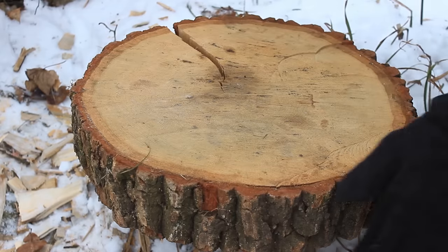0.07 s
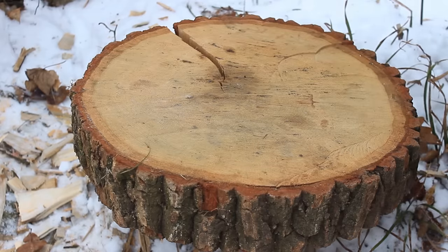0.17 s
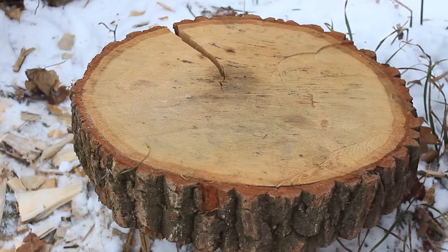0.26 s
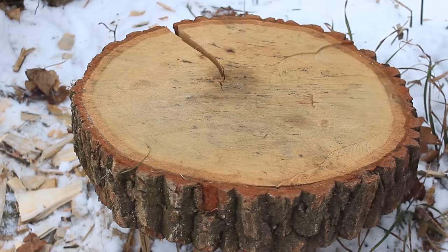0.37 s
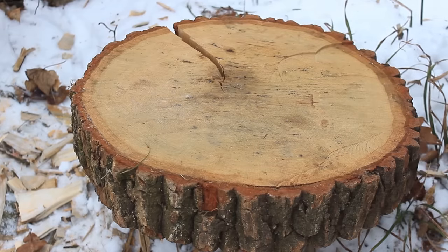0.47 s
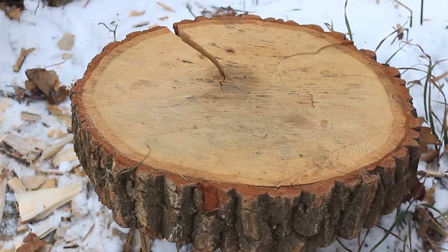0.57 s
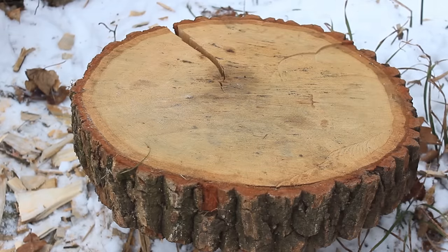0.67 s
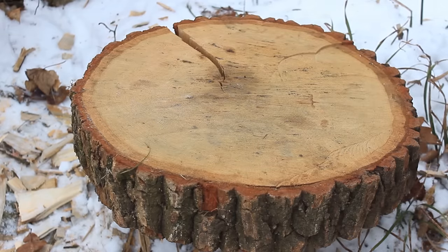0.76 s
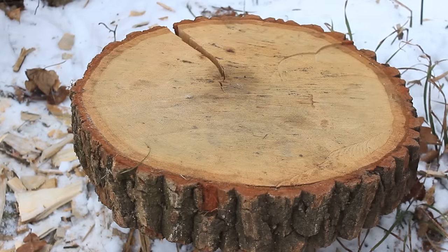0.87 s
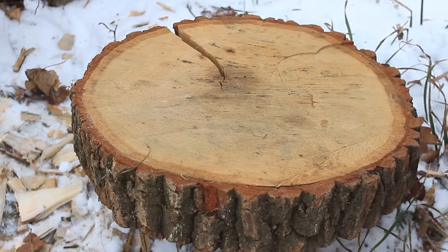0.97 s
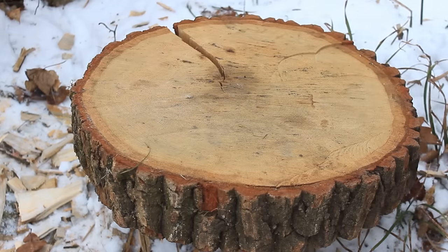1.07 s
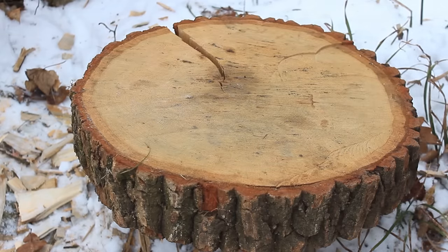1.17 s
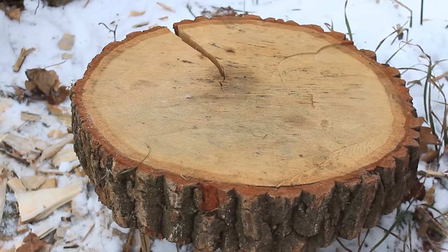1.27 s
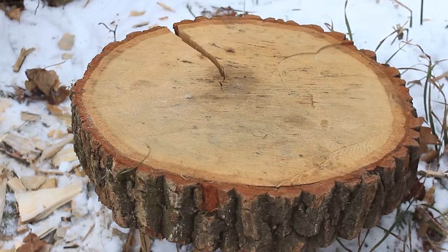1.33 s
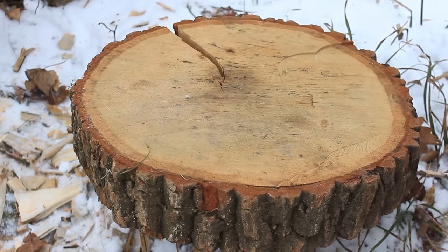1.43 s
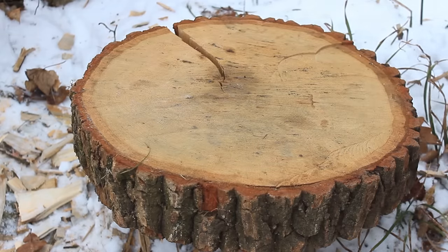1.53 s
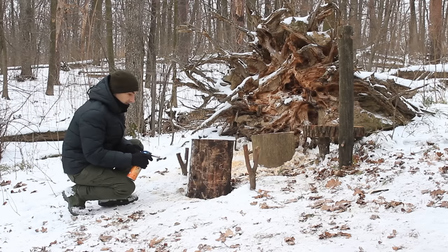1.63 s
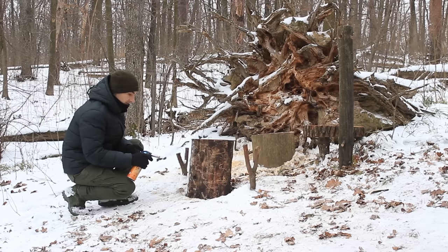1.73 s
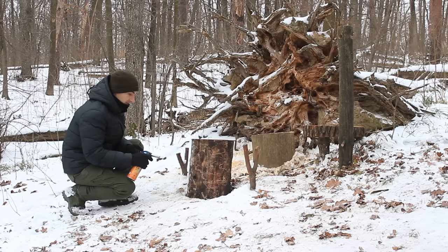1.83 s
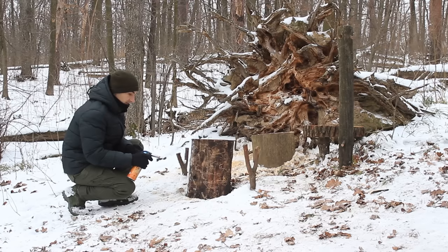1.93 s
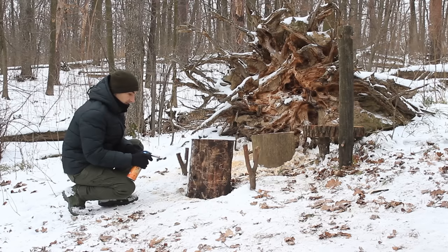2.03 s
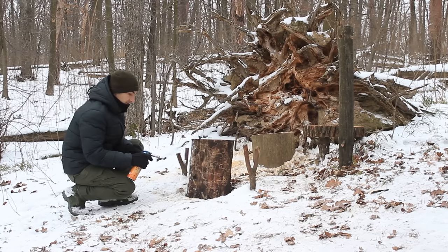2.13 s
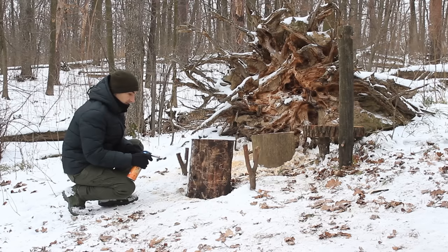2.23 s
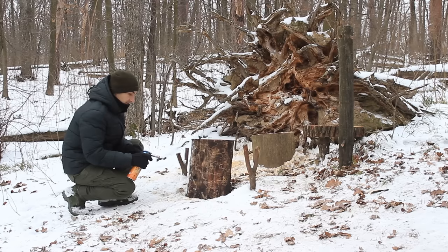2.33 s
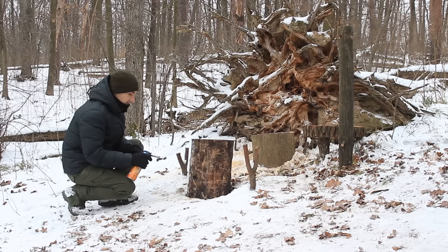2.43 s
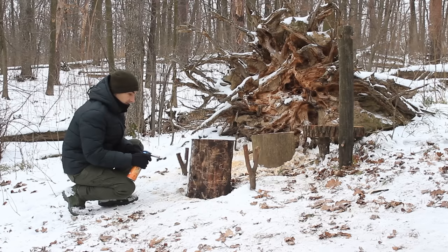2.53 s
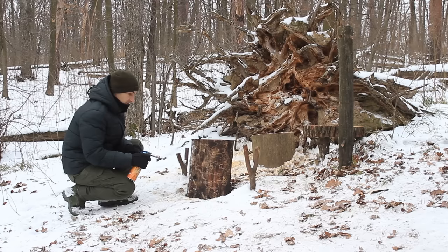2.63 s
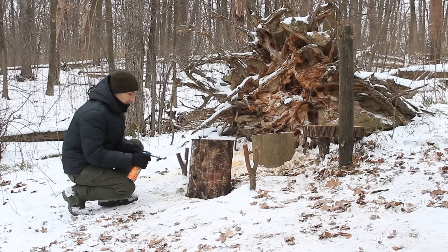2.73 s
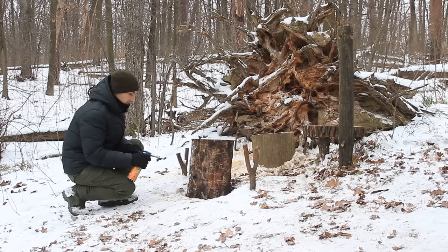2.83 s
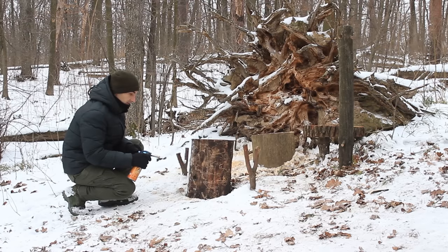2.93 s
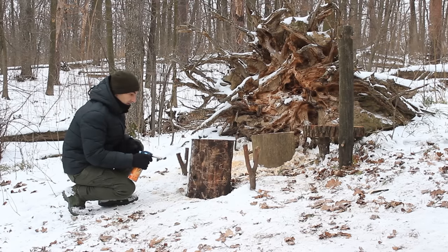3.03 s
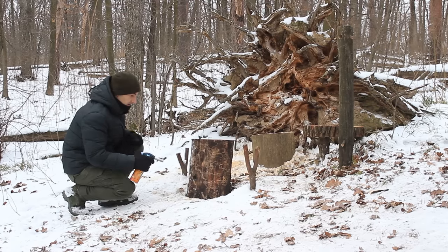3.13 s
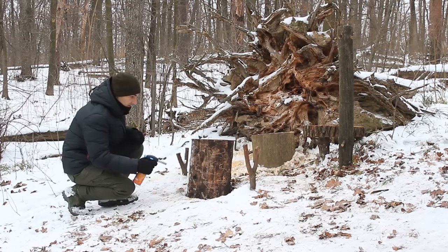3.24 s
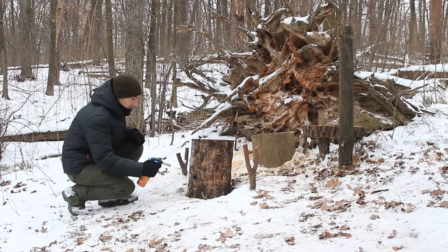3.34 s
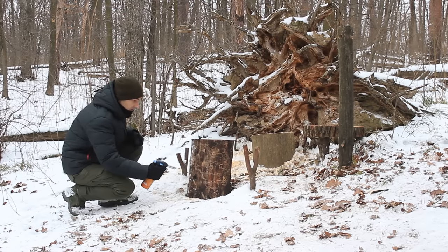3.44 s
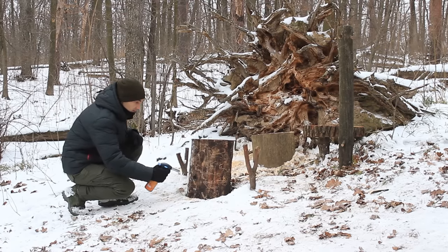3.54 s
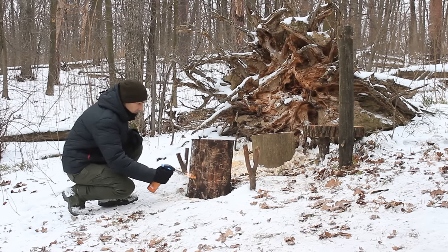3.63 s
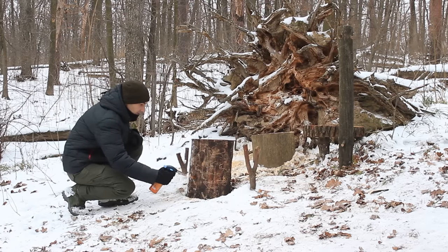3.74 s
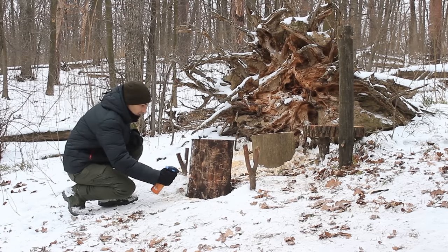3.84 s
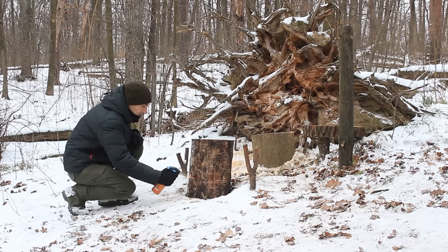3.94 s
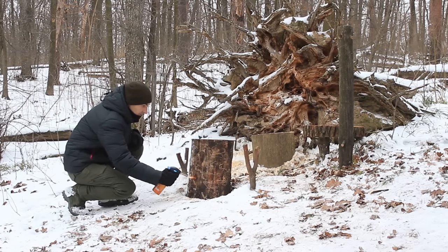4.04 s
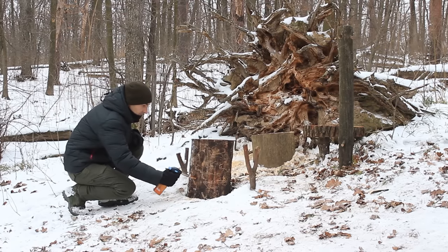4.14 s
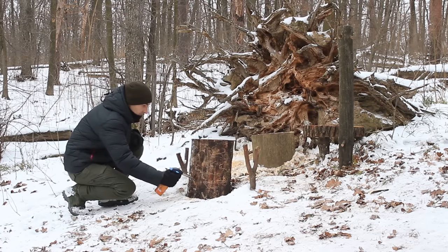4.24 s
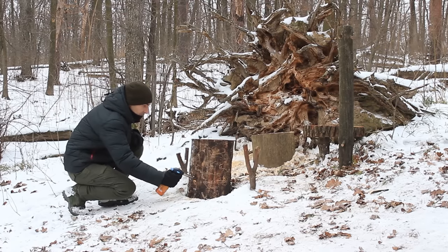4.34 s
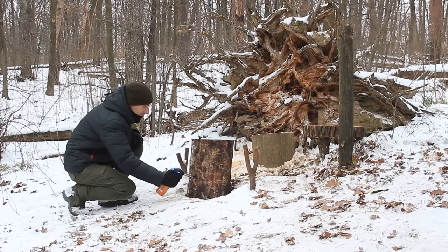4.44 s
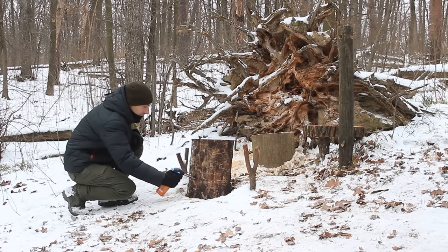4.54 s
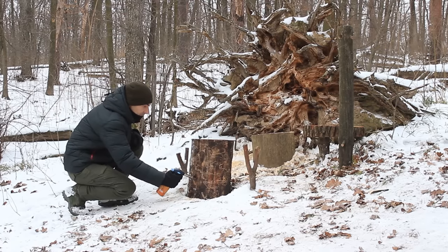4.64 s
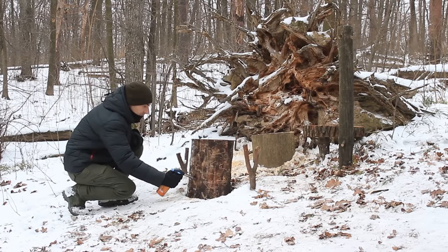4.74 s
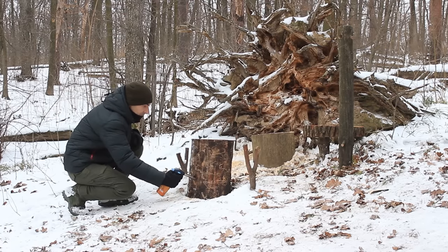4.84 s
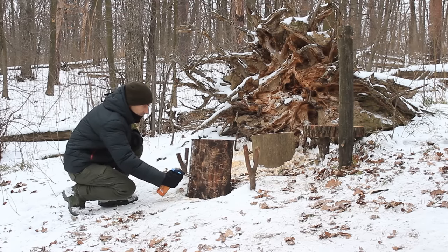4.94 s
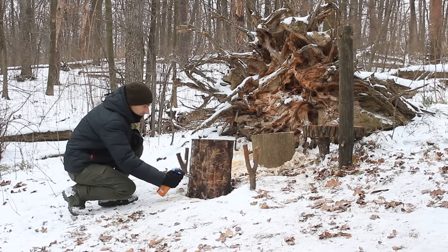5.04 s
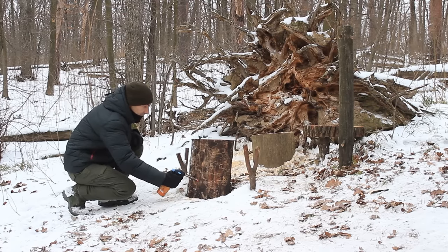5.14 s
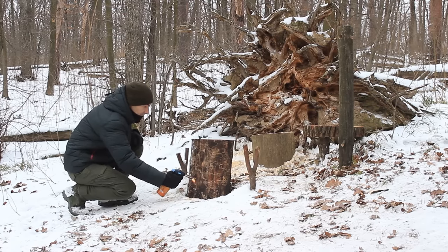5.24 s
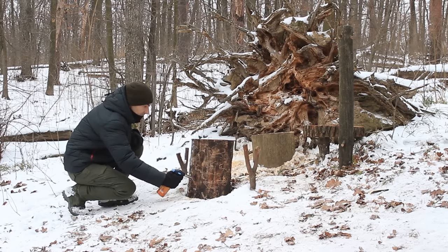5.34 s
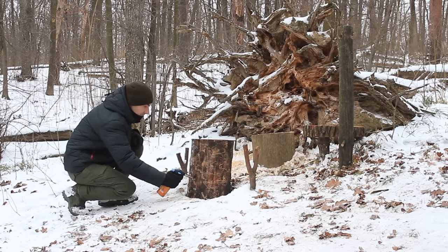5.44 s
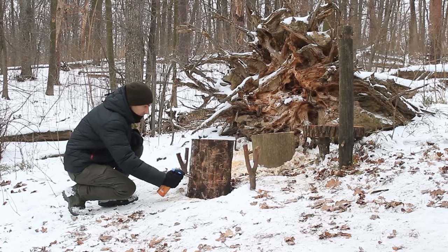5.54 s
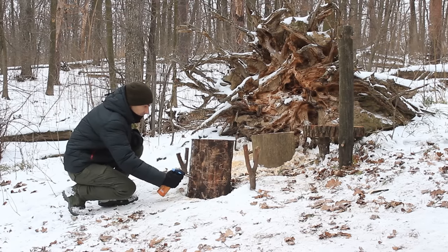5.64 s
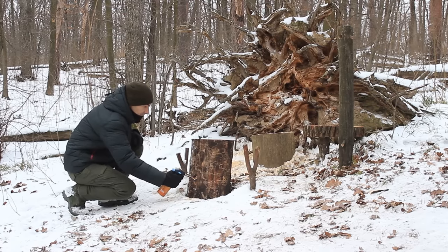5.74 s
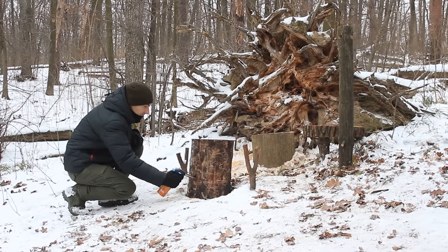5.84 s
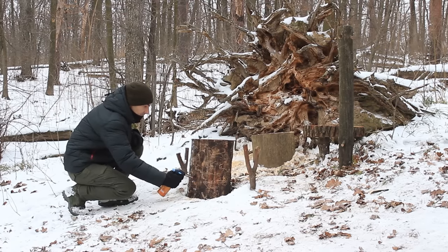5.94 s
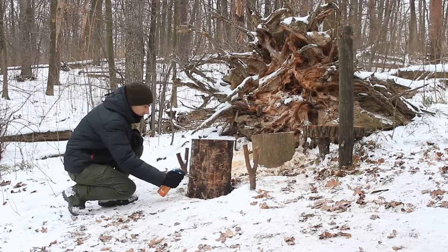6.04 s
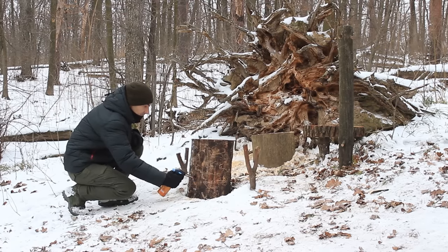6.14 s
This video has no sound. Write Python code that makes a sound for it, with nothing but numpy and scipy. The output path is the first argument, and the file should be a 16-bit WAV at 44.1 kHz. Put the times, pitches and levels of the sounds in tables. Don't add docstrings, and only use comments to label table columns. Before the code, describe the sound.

Quiet cloth rubbing and sparse gritty snow creaks come first, close to the microphone outdoors in winter. After about two seconds a soft, tube-like gas hiss opens, followed by a hard metallic click and a short low thump of ignition. The burning torch roars far louder than everything before, breathy and slightly hollow, sweeping brighter as it descends toward wood. It continues unsteadily, with fluttering hiss and occasional dull pops, to the end. Mono.

```python
import sys
import numpy as np
from scipy import signal
from scipy.io import wavfile
from scipy.ndimage import uniform_filter1d

SR = 44100
rng = np.random.default_rng(int(sys.argv[2]) if len(sys.argv) > 2 else 0)


def ratio(d):
    e = np.asarray(d, float) / 20
    return 10 ** e


def to_wav(sig):
    pcm = np.clip(np.atleast_2d(sig), -1, 1) * 32767
    pcm = np.round(pcm).astype(np.int16)
    wavfile.write(sys.argv[1], SR, pcm.T)


N = 273243
HZ = np.fft.rfftfreq(1024, 1 / SR)
FRAME_S = np.arange(N // 256 + 5) * 256 / SR
SNAP_S = 2.7073

# f/Hz, level/dB (per Hz)
FLAME_TONE = [(35, -62), (60, -33), (211, -2), (261, -3), (388, 1.5), (940, -4), (1080, -9), (1680, -7.5),
              (4090, -28), (5400, -29), (6510, -30), (7670, -34.5), (9240, -36), (15800, -50.5)]
# f/Hz, width/Hz, lift held high/dB, lift at the log/dB
HOT_PIPE = [(398, 270, 3, -3.5), (457, 440, 0, 0.5), (1057, 33.4, 21, 15), (1220, 51, 6.5, 7.5),
            (1349, 81, 10, -4.5), (1400, 54, -6.5, 11.5), (1530, 430, -9, 1.5), (2090, 100, 3, -13),
            (2410, 78, -1, -6), (1697, 75, -2, -10), (2640, 130, -9, 1.5), (2930, 710, 0, 6),
            (4660, 830, 6, 1), (3070, 89, 5, -5), (4060, 280, 6.5, 6), (5560, 300, -3, -1),
            (6370, 200, 9, 4.5), (9230, 430, 6.5, 12.5), (11000, 150, 6, 6), (12200, 990, 7, 14),
            (13600, 900, 3, 2), (15200, 2700, 6, 9)]
# t/s, share of the way (0-1)
TORCH_PATH = [
    (2.7, 0.06),
    (3.15, 0.01),
    (3.35, 0.32),
    (3.48, 0.47),
    (3.6, 0.7),
    (3.7, 0.84),
    (3.8, 1),
    (4.3, 0.92),
    (6.2, 1.02),
]
# t/s, share (0-1), spread/s
GRAZE = [
    (3.8, 1, 0.081),
]
# t/s, lift/dB, spread/s
FLARES = [(3.38, 0, 0.014), (3.43, -0.5, .015), (3.47, 2, .012), (3.5, 0, 0.013), (3.64, 4, 0.021),
          (3.82, 0, .03), (4.03, 1.5, 0.022), (4.11, -2.5, 0.037), (4.39, 2, 0.022), (4.47, -1, .02),
          (4.62, 1, 0.076), (4.79, 1.5, 0.098), (5.02, 2.5, .04), (5.38, -2.5, .025), (5.5, -4.5, 0.014),
          (5.72, 0.5, 0.018), (6.0, -1, .03), (6.13, 0, 0.021)]
# t/s, lift/dB, spread/s
DRAUGHTS = [(3.46, -2, 0.029), (3.83, 5, 0.091), (3.89, -7, 0.04), (4.01, 2, 0.021), (4.25, -3, 0.027),
            (4.33, -7, 0.036), (4.47, -10, .02), (4.53, 3.5, .04), (4.62, -2, .015), (4.66, -1, .02),
            (4.76, -10, 0.028), (4.85, 2, 0.046), (5.05, -12, .035), (5.12, 5, 0.018), (5.39, 5, 0.037),
            (5.46, -3, .02), (5.55, 3, 0.032), (5.9, 3, .03), (6.15, -10, 0.053), (6.2, 8, .02)]


def flame():
    lowered = curve(TORCH_PATH, FRAME_S)
    bite = ramp(FRAME_S, 3.9, 4.67)
    graze = bumps(GRAZE, FRAME_S)
    flare_db, draught_db = bumps(FLARES, FRAME_S), bumps(DRAUGHTS, FRAME_S)
    flash_db = 9 * np.exp(-np.maximum(FRAME_S - SNAP_S - .02, 0) / 0.0069)

    roar_db = -39 + 3.5 * lowered + 0.5 * bite + flare_db * (1 - 0.5 * above(1060))
    rush_db = -46.5 - 5 * abs(lowered) ** 0.57 + 4 * bite
    rush_db = rush_db + 0.42 * flare_db + 0.22 * draught_db + .2 * flash_db
    jet_db = -58.5 - 2 * abs(lowered) ** 0.52 + flash_db
    jet_db = jet_db + draught_db * (1 - 0.54 * above(9500))
    rasp_db = -3.5 * lowered + 6 * bite - 2.5 * graze

    waver = 1 + 0.0046 * evened(uniform_filter1d(rng.standard_normal(len(FRAME_S)), size=25))
    low = np.clip(0.031 + 0.69 * lowered + 0.23 * bite, 0, 1)
    pipe_db = sum((high + low * (down - high)) * hump(hz * waver, w) for hz, w, high, down in HOT_PIPE)

    notch_hz = 1 / ((1 - lowered) / 725 + lowered / 2100)
    snow = echo(notch_hz, 2.92 * notch_hz, 0.52 + 0.35 * graze, dull_hz=3430)
    stump = echo(582, 349, 0.067 + 0.17 * low, dull_hz=1700)
    tone = ratio(read(FLAME_TONE) + pipe_db + rasp_db * hump(1030, 900)) * snow * stump

    roar = noise(tone * np.sqrt(1 - above(2300)), (150, 1400), roar_db, patchy_db=1.03, flicker_db=0.8)
    rush_tone = tone * np.sqrt(above(2310) - above(6430))
    rush = noise(rush_tone, (2600, 6800), rush_db, patchy_db=1.1, flicker_db=0.4)
    jet = noise(tone * np.sqrt(above(6500)), (7000, 15000), jet_db, patchy_db=2.3, flicker_db=1.2)
    roar = signal.lfilter(*signal.butter(2, 95, "high", fs=SR), roar)
    roar = signal.lfilter(*signal.iirnotch(258, 4.5, SR), roar)
    drone = hum(215.4, 45.4, level_db=-48)
    lit = np.clip((np.arange(N) / SR - SNAP_S - .003) / 0.0021, 0, 1)
    return (roar + drone + rush + jet) * lit


# delay t/s, level/dB
SNAP = [
    (0, -7),
    (.0004, -2),
    (.0008, -1),
    (.0012, -1),
    (.0017, -5),
    (.0042, -15),
    (.0072, -15),
]
# f/Hz, level/dB, time to fall 60 dB/s
SNAP_MODES = [(1850, -9, .018), (2650, 6, .011), (3350, 2, .011), (4100, -3, .007), (4900, 6, .008),
              (5300, -4, .006), (6600, 0, .007), (7300, 3, .007), (8400, -4, .012), (9300, -2, .005),
              (10050, 3, .007), (12370, -7, .022), (14400, -13, .025)]
# t/s, f/Hz, level/dB, time to fall 60 dB/s
RINGS = [
    (2.712, 1034, -35.5, 0.19),
    (2.712, 446, -42, 0.043),
    (2.709, 84, -35, 0.13),
    (2.713, 1780, -24.5, 0.022),
]
# t/s, f/Hz, level/dB, swell/s
THUMP = (2.7085, 170, -24.5, .0043)


def ignition():
    out, t = np.zeros(N), np.arange(5000) / SR
    phases = rng.random((len(SNAP), len(SNAP_MODES)))
    for (late, db), turns in zip(SNAP, phases):
        ring = np.zeros(len(t))
        for (hz, mode_db, t60), turn in zip(SNAP_MODES, turns):
            ring += ratio(mode_db - 60 * t / t60) * np.sin(2 * np.pi * (hz * t + turn))
        add(out, SNAP_S + late, ratio(db - 28) * ring)
    rattle = ratio(-29 - 60 * t / .032) * rng.standard_normal(len(t))
    add(out, SNAP_S, rattle)
    snap_echo = ratio(-40 - 60 * t / .012) * np.sin(2 * np.pi * 10100 * t)
    add(out, SNAP_S + .022, snap_echo)

    for s, hz, db, t60 in RINGS:
        onset = 1 - np.exp(-t / 0.00077)
        add(out, s, ratio(db - 60 * t / t60) * onset * np.sin(2 * np.pi * hz * t))
    s, hz, db, swell = THUMP
    push = (t / swell * np.exp(1 - t / swell)) ** 2
    add(out, s, ratio(db) * push * np.sin(2 * np.pi * hz * t))
    return out


# f/Hz, level/dB
GAS_TONE = [(700, -22), (2000, -21), (5000, -13.5), (9000, -19.5), (10500, -30), (11300, -25),
            (11700, -17.5), (12500, -21), (12900, -28), (14500, -23), (15800, -22)]
# f/Hz, width/Hz, level/dB
COLD_PIPE = [(1620, 96, -7), (2570, 200, -7.5), (3555, 185, 1.5), (4230, 120, -4.5), (4590, 56, -6),
             (5230, 220, -11.5), (6120, 170, -5.5), (6860, 290, -12), (7800, 300, -15), (8750, 160, -21),
             (12200, 260, -20), (14100, 170, -17), (15300, 46, -13)]


def gas():
    pipe_power = sum(ratio(2 * db) * hump(hz, 1.5 * w) ** 2 for hz, w, db in COLD_PIPE)
    tone = np.sqrt(ratio(2 * read(GAS_TONE)) + pipe_power)
    hiss = noise(tone, (2300, 9000), 0, patchy_db=0.7, flicker_db=0.5) + hum(248, 50, level_db=-24)
    t = np.arange(N) / SR
    opening_db = -19 * np.exp(-np.maximum(t - 2.018, 0) / 0.025)
    trigger_db = -28 * np.maximum(t - 2.65, 0)
    fade_in = np.clip((t - 2.0) / 0.027, 0, 1)
    burnt = np.clip((SNAP_S + 0.019 - t) / 0.0058, 0, 1)
    return hiss * ratio(-49.5 + opening_db + trigger_db) * fade_in * burnt


# t/s, peak level/dB
POPS = [
    (3.9522, -26),
    (3.9581, -24),
    (4.498, -33),
    (4.501, -33),
    (4.5213, -26),
    (5.0567, -29),
    (5.311, -24),
]


def pops():
    out, u = np.zeros(N), np.arange(-100, 100) / SR / 0.00045
    for s, db in POPS:
        add(out, s - 100 / SR, ratio(db) * (u ** 2 - 1) * np.exp(-u ** 2 / 2))
    return out


# t/s, peak level/dB, f/Hz, length/ms
CREAKS = [(0.019, -43, 1870, 0.65), (.097, -44, 2300, .6), (0.282, -38, 1500, 0.56), (.287, -42, 1900, .35),
          (.42, -56, 2300, .6), (1.252, -38, 3800, .4), (1.2988, -40, 3700, .35), (1.302, -36, 4500, .35),
          (1.3036, -35, 3900, 0.26), (1.306, -40, 2100, .5), (1.3172, -43, 5800, .15),
          (1.367, -30, 4600, 0.19), (1.372, -29, 4080, 0.24), (1.3763, -32, 4800, .1),
          (1.384, -42, 4000, .2), (1.4294, -44, 4800, .3), (1.51, -38.5, 2390, 0.27),
          (1.5394, -38, 3500, 0.14), (1.6906, -47, 2400, .3), (1.919, -40, 3000, 0.15)]


def creaks():
    out, t = np.zeros(N), np.arange(400) / SR
    grits = rng.standard_normal((len(CREAKS), 400))
    for (s, db, hz, ms), grit in zip(CREAKS, grits):
        u = t * 1000 / max(ms, .05)
        tones = np.cos(2 * np.pi * hz * t) + 0.6 * np.cos(2 * np.pi * 0.68 * hz * t)
        crack = u * np.exp(1 - u) * tones / 1.36
        tail = .12 * np.diff(uniform_filter1d(grit, size=4), prepend=0) * np.exp(-t / .002)
        add(out, s, ratio(db) * (crack + tail))
    return out


# f/Hz, level/dB (per Hz)
RUSTLE_TONE = [(59, -42), (100, -15), (214, -13), (282, -2.5), (422, -4), (544, -1), (886, -5), (3160, -7),
               (8730, -17), (15800, -19)]
# t/s, effort level/dB
SLEEVE = [
    (0, -10),
    (.5, -2.5),
    (.7, -0.5),
    (.8, -3),
    (.92, -2),
    (1.02, 1),
    (1.17, 1),
    (1.4, -7.5),
    (1.88, -15.5),
]
# t/s, lift/dB, spread/s
BRUSH = [
    (.64, 4, 0.055),
]


def sleeve():
    effort_db = curve(SLEEVE, FRAME_S)
    rub_db = -52 + 0.35 * effort_db * (1 - ramp(FRAME_S, 0.86, 1.66)) + fading_db()
    rustle_db = -51 + effort_db
    fibre_db = -59.5 + 0.67 * effort_db + bumps(BRUSH, FRAME_S)
    tone = ratio(read(RUSTLE_TONE))
    rub = noise(tone * np.sqrt(1 - above(1410)), (200, 1200), rub_db, patchy_db=1.0, flicker_db=1.5)
    rustle_tone = tone * np.sqrt(above(1350) - above(6400))
    rustle = noise(rustle_tone, (2200, 6000), rustle_db, patchy_db=0.6, flicker_db=0.84)
    fibre = noise(tone * np.sqrt(above(5160)), (7000, 15000), fibre_db, patchy_db=2.15, flicker_db=-0.1)
    return rub + rustle + fibre


# f/Hz, level/dB (per Hz)
RUMBLE = [(20, -27), (35, -5.5), (50, -2), (68, 2), (110, -7.5), (160, -12.5), (220, -4), (300, -13),
          (500, -26)]
# t/s, lift/dB, spread/s
AIR_SWELLS = [
    (.7, 0.5, .1),
    (.98, -5, .08),
    (1.3, 4, .08),
    (1.9, -1, .1),
]


def background():
    calm_db = 0.31 * fading_db()
    rumble_db = -66 + calm_db + bumps(AIR_SWELLS, FRAME_S)
    rumble = noise(ratio(read(RUMBLE)), (25, 120), rumble_db, patchy_db=1.3, flicker_db=2.0)
    engine = hum(63, 8, level_db=-72.5) * ratio(np.interp(np.arange(N) / SR, FRAME_S, calm_db))
    return rumble + engine


def fading_db():
    return -18.5 * (np.clip(FRAME_S, 1.163, 2.12) - 1.163)


def noise(shape, band, level_db, patchy_db, flicker_db):
    inside = (HZ > band[0]) & (HZ < band[1])
    shape = shape / np.sqrt((shape[inside] ** 2).sum(0))
    a, b, patches = rng.standard_normal((len(FRAME_S), len(HZ), 3)).T
    patches = uniform_filter1d(patches, size=10, axis=0)
    patches = evened(uniform_filter1d(patches, size=10, axis=1))
    flicker = evened(uniform_filter1d(rng.standard_normal(len(FRAME_S)), size=4))
    gain = ratio(level_db + patchy_db * patches + flicker_db * flicker)
    z = (a + 1j * b) * shape * gain
    return np.sqrt(1.5) * signal.istft(z, nperseg=1024, noverlap=768)[1][:N]


def hum(hz, width, level_db):
    b, a = signal.iirpeak(hz, hz / width, SR)
    once = signal.lfilter(b, a, rng.standard_normal(N))
    return ratio(level_db) * evened(signal.lfilter(b, a, once))


def echo(notch_hz, spacing_hz, share, dull_hz):
    weak = np.clip(share, 0, .95) / (1 + (HZ[:, None] / dull_hz) ** 2)
    return abs(1 - weak * np.exp(2j * np.pi * (HZ[:, None] - notch_hz) / spacing_hz))


def hump(hz, width):
    return 1 / (1 + (2 * (HZ[:, None] - hz) / width) ** 2)


def above(hz):
    return 1 / (1 + (hz / (HZ[:, None] + 1)) ** 8)


def read(points):
    f, db = np.transpose(points)
    return np.interp(np.log(HZ + 1), np.log(f), db, left=-70)[:, None]


def curve(rows, s):
    at, value = np.transpose(rows)
    return np.interp(s, at, value)


def bumps(rows, s):
    return sum(lift * np.exp(-.5 * ((s - at) / spread) ** 2) for at, lift, spread in rows)


def ramp(s, start, end):
    return np.clip((s - start) / (end - start), 0, 1)


def evened(x):
    return x / np.sqrt(np.mean(x ** 2) + 1e-20)


def add(mix, s, sound):
    part = mix[round(s * SR):][:len(sound)]
    part += sound[:len(part)]


def scene():
    mono = flame() + ignition() + gas() + pops() + creaks() + sleeve() + background()
    return np.tile(mono, (2, 1))


def roll_off(x):
    return signal.sosfilt(signal.butter(12, 16680, fs=SR, output="sos"), x)


def record(dry):
    edge = signal.firwin(511, 15720, window=("kaiser", 9), fs=SR)
    mix = signal.oaconvolve(dry, edge[None], "same") + 0.00085
    return roll_off(mix)


dry = scene()
out = record(dry)
to_wav(out)
```